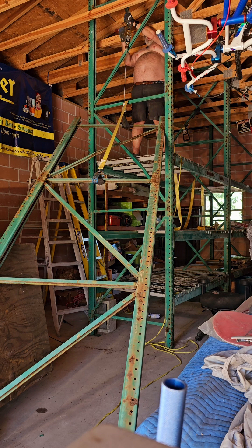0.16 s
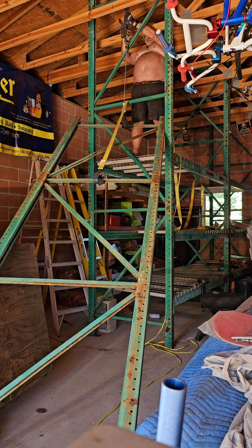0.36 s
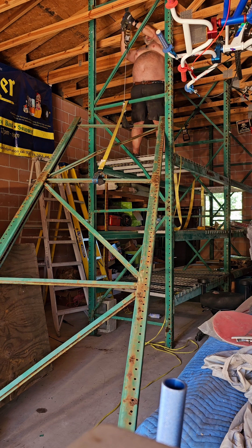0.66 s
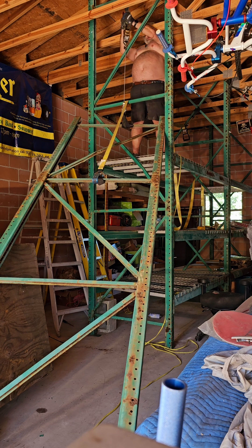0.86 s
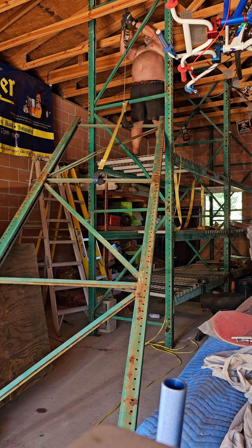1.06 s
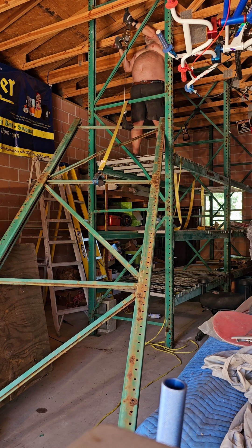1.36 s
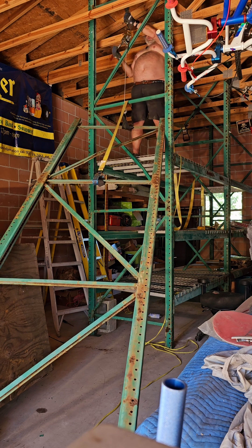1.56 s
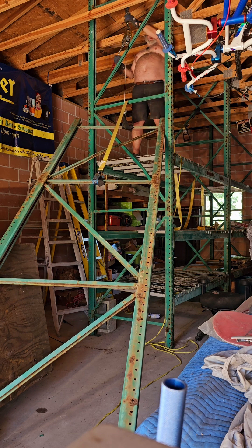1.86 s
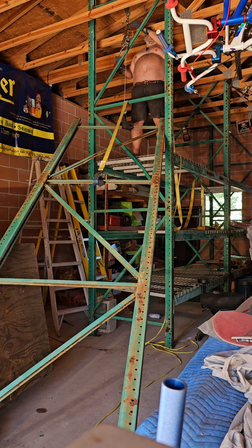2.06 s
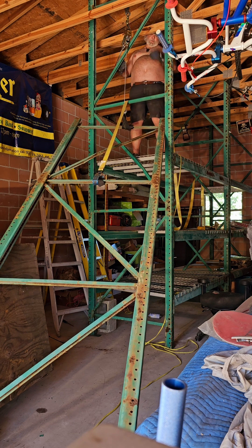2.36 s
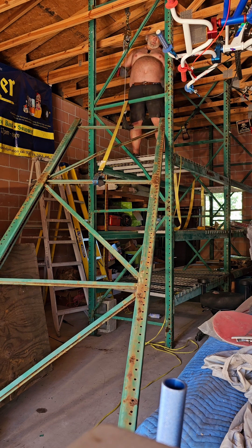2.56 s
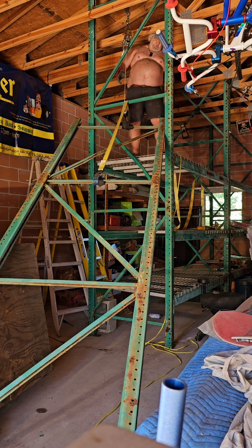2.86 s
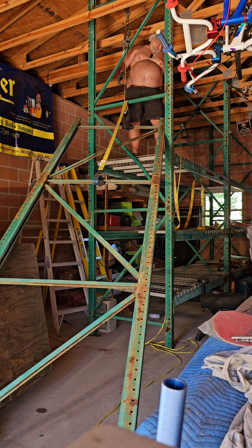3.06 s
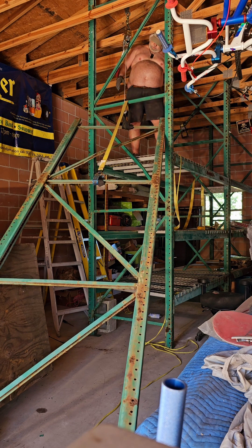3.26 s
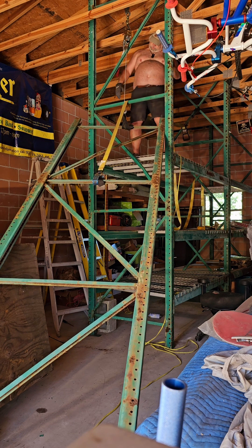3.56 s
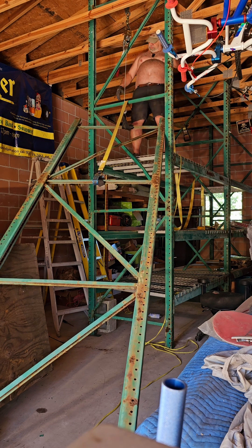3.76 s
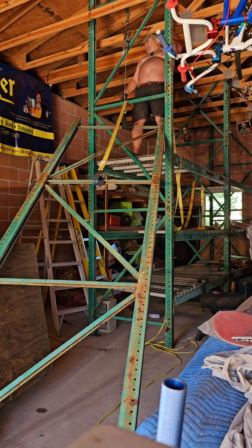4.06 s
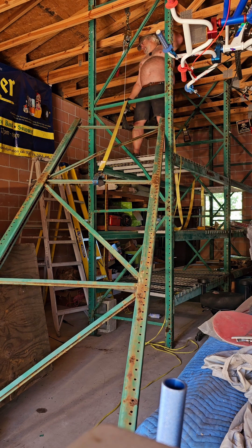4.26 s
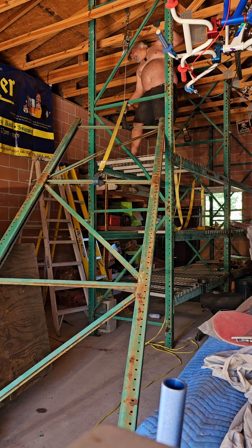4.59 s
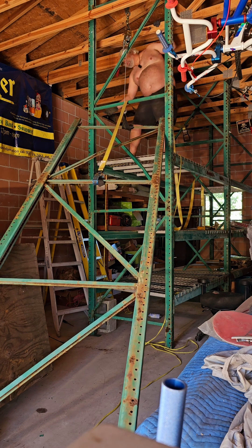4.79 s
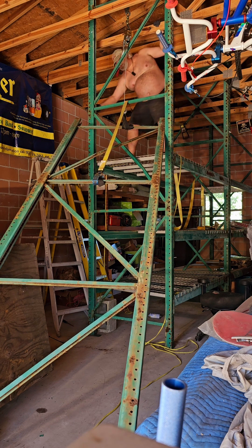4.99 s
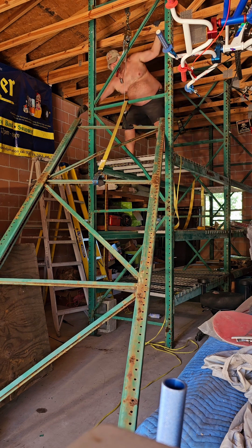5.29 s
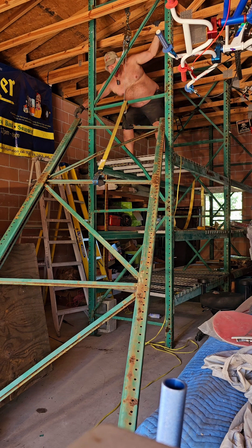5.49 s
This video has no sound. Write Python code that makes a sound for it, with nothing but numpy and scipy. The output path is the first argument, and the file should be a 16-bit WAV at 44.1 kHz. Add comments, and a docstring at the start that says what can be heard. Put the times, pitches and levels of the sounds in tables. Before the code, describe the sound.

Faint metal ticks open over quiet air and low rumble. One bright crack comes at about one second, then a cluster of chain snaps with a brief gritty scrape, then the biggest clank with a clangy decaying ring. A few softer clicks follow, and the last seconds are nearly empty: rumble, weak hum, slight frame singing. Wide stereo pickup in a hard garage.

```python
"""A chain hoist is worked on a steel storage rack in a garage: links and pawl snap as noise cracks with short rings.
Its hook knocks the frame: noise clangs and decaying modes, with a loud clank near 2.75 s.
The chain is drawn once over the steel: a dense train of tiny contacts.
Under it, shaped noise gives air, a low rumble that surges, a faint hum and soft singing of the frame;
a few dry ticks are short noise bursts."""
import sys
import numpy as np
from scipy import signal
from scipy.fft import rfft, irfft, next_fast_len
from scipy.io import wavfile

SR = 44100
rng = np.random.default_rng(int(sys.argv[2]) if len(sys.argv) > 2 else 0)


def master(y):
    """Save y as 16-bit WAV."""
    cut = np.clip(np.atleast_2d(y).T, -1, 1)
    pcm = np.round(cut * 32767)  # scale
    wavfile.write(sys.argv[1], SR, pcm.astype(np.int16))


N = 248283

# Snaps of links and pawl. Each row: start in seconds, level in dB, brightness in dB per octave, link pitch in Hz.
LINK_SNAPS = [(0.046, -43.5, 10.5, 3780), (0.324, -45.5, 1.5, 2150), (0.367, -42.5, -8, 4330),
              (0.706, -60, -5, 2130), (0.796, -42.5, -12, 3200), (0.973, -10.5, 2, 5213),
              (1.260, -36, -4.5, 3890), (1.416, -42, -16, 4240), (1.445, -18.5, 1, 4020),
              (1.558, -19.5, 5.5, 3440), (1.746, -20.5, 4.5, 4130), (2.0575, -21.5, 3.5, 4390),
              (2.718, -21.5, 3.5, 9100), (2.749, -14, -1.5, 4700), (2.876, -28.5, -5, 9020),
              (3.004, -34, -7, 4230), (3.119, -38, -14, 4020)]
# Knocks on the frame. Each row: start in seconds, level in dB, resonance of the struck part in Hz,
# its prominence in dB.
FRAME_KNOCKS = [(0.04, -48, 387, 17.5), (0.33, -51, 2200, -0.5), (0.797, -35.5, 2100, 10.5),
                (0.974, -30.5, 1650, 9), (1.365, -36, 465, 6), (1.447, -21.5, 3820, 10),
                (1.558, -30.5, 2400, 8), (1.748, -34, 2154, 5.5), (2.06, -41, 2220, -1),
                (2.56, -54, 2102, 11), (2.7494, -18, 1510, 16), (2.775, -24.5, 568, 14.5),
                (3.122, -33, 1250, 7.5)]
# Strongest modes of the frame. Each row: frequency in Hz, relative level in dB, T60 in seconds.
FRAME_MODES = [(363, -7.5, 2.1), (384.3, -4.5, 2), (430, -15.5, 0.606), (498.2, -1, 1.2), (532, 0.5, 0.76),
               (617.6, -3.5, 0.9), (820, -14.5, 2.4), (1106, -7.5, 1.9), (1135, -9, 1.7),
               (1324, -10.5, 1.508), (1430, -12.5, 1.1), (1400, -16.5, 0.51), (1629, -4, 0.74),
               (1700, -9, 0.214), (1737, -1.5, .6), (1808, -15, 0.51), (2039, -17, 0.44), (2300, -11, 1.4),
               (2900, -25.5, .9)]
# Modes of the steel hook. Each row: frequency in Hz, relative level in dB, T60 in seconds.
HOOK_MODES = [(2990, -16.5, 1), (3300, -9, 1), (4220, 0.5, 0.3334), (4157, -1.5, .3), (7500, -7, 0.9),
              (7310, -3, 0.47), (7490, 2.5, 0.48), (9050, -21, 0.78), (11285, -5.5, 0.27), (11930, -14, .3)]
# Spectrum of steel snaps. Each row: frequency in Hz, relative density in dB per Hz.
SNAP_SPECTRUM = [(100, -24), (500, -18.5), (1400, -6.5), (2000, -5.5), (3000, -6.5), (4300, -0.5),
                 (6000, -3), (9300, -5), (10300, -8), (11600, -7), (12700, -15), (15500, -20)]
# Spectrum of the knocked beams. Each row: frequency in Hz, relative density in dB per Hz.
BEAM_SPECTRUM = [(50, -27), (120, -12.5), (190, -13.5), (270, -9.5), (370, -1), (560, 1), (760, -7),
                 (1050, -5.5), (1650, -9.5), (2000, -0.5), (2500, -7.5), (3100, -4.5), (4200, -6),
                 (6500, -17.5), (14000, -41.5)]
# Spectrum of room air. Each row: frequency in Hz, relative density in dB per Hz.
AIR_SPECTRUM = [(30, -25), (70, -9), (170, -16), (350, -19), (530, -19), (700, -22), (1150, -23),
                (2000, -28), (3000, -34), (5000, -40), (9000, -50.5), (15000, -55)]
# Spectrum of the rumble. Each row: frequency in Hz, relative density in dB per Hz.
RUMBLE_SPECTRUM = [(15, -34.5), (30, -27), (42, 1.5), (55, -4.5), (80, -7), (160, -26.5), (400, -69.5),
                   (2000, -110)]
# Decay of the garage. Each row: frequency in Hz, T60 in seconds.
GARAGE_DECAY = [(200, .8), (1000, .7), (2600, .52), (4500, .38), (7000, .29), (11000, .23), (16000, .18)]
# Decay of the beams. Each row: frequency in Hz, T60 in seconds.
BEAM_DECAY = [(150, 5), (400, 1.3), (1000, 1.885), (1800, 1.105), (2800, 1.113), (5000, 0.71), (12000, 1.3)]
# Hum components. Each row: frequency in Hz, relative level in dB.
HUM_TONES = [(120, -3.5), (205, -1.5), (242, -8)]
# Tones of the singing frame. Each row: frequency in Hz, relative level in dB.
SINGING_TONES = [(365, -6), (480, -7), (525, -3), (605, -6.5), (830, -12), (985, -8.5), (1090, -5.5),
                 (1140, -2.5), (1308, -5)]
# Colour of the two microphone ports. Each row: frequency in Hz, left minus right in dB.
PORT_BALANCE = [(380, 0), (700, 2.5), (1290, 0), (2380, 0), (4400, -5.5), (8100, 5), (15000, 5.5)]
# Rumble surges. Each row: start in seconds, decay time constant in seconds, level before build-up and decay in dB.
RUMBLE_SURGES = [(0, 0.098, -44.5), (1.0, .9, -52.5), (3.498, 0.73, -50), (5.4, 0.41, -53)]
# Faint dry ticks. Each row: start in seconds, level before decay in dB.
DRY_TICKS = [(4.404, -57), (5.554, -65), (5.609, -61)]

AIR_DB, RUMBLE_DB, HUM_DB = -59, -60.5, -63
SURGE_RISE_S = 0.066
# The frame sings all the time and swells once as weight shifts on it.
SING_DB, LEAN_S, LEAN_SETTLE_S, LEAN_DB = -64, 4.88, 1.1, -56
TICK_HZ, TICK_WIDTH_HZ, TICK_DECAY_S = 7000, 2500, .003
# The drag rises in level, holds, then stops.
DRAG_START_S, DRAG_RISE_S, DRAG_END_S, DRAG_DB, DRAG_GROWTH_DB = 1.285, 0.059, 1.47, -48, 28
# Softer knocks than the reference are slightly duller and barely stir the hook.
REF_BLOW_DB, REF_TILT_DB_PER_OCT, REF_HOOK_DB = -17, -0.23, -30
TILT_DB_PER_OCT_PER_DB, HOOK_DB_PER_DB = 0.01, 2
# A slack link, lightly touched, rings freely; a taut one, snapped hard, is damped.
LIGHT_SNAP_DB, LINK_RING_DB, LINK_DAMPING_DB_PER_DB = -44.5, -7, 0.41
MIC_GAP_M, LEFT_LEAD_S = .15, .00026
EDGE_HZ = 15550


def amp(db):
    """Decibels to gain."""
    return 10 ** (np.asarray(db) / 20)


def unit(x):
    """Scales to rms 1."""
    return x / np.sqrt(np.mean(x ** 2) + 1e-20)


def read(points, hz):
    """Reads a table along a log-frequency axis."""
    f, value = np.transpose(points)
    return np.interp(np.log(hz + 1), np.log(f + 1), value)


def add(mix, start_s, sound):
    """Mixes in a stereo sound at start_s."""
    part = mix[:, max(round(start_s * SR), 0):][:, :sound.shape[1]]
    part += sound[:, :part.shape[1]]


def peak(hz, centre_hz, width_hz):
    """Bell of one resonance: 1 at its centre, 1/2 at width_hz to either side."""
    return 1 / (1 + ((hz - centre_hz) / width_hz) ** 2)


def ripple(hz, width_hz):
    """Random peaks and dips along frequency: many overlapping resonances."""
    heights = rng.standard_normal(4096)
    return np.interp(hz / width_hz, np.arange(len(heights)), heights)


def likeness(hz):
    """Correlation of two spaced microphones in sound that comes from all sides."""
    return .99 * np.sinc(2 * hz * MIC_GAP_M / 343)


def diffuse(colour_db):
    """Stereo noise from all sides with the given spectrum, rms 1."""
    same = likeness(np.linspace(0, SR / 2, len(colour_db)))
    a, b = np.exp(2j * np.pi * rng.random((2, len(same))))
    mid = a * np.sqrt(1 + same)
    side = b * np.sqrt(1 - same)
    return unit(irfft(np.array([mid + side, mid - side]) * amp(colour_db)))


def swell(t, hz, spread_s):
    """Build-up of a vibration: spread_s is its time constant at 1 kHz, and bass comes later."""
    rise_s = spread_s * (1000 / np.maximum(hz, 450)) ** 1.5
    return 1 - np.exp(-(t + 1 / SR) / rise_s)


def fade(x, t60, spread_s):
    """Each band swells and dies at its own speed."""
    hz, t, z = signal.stft(x, SR, nperseg=256)
    decay = amp(-60 * t / read(t60, hz)[:, None])
    z = z * decay * swell(t, hz[:, None], spread_s)
    return signal.istft(z, SR, nperseg=256)[1][:, :x.shape[1]]


def ring(modes, t, spread_s, twin_hz):
    """Dying modes, each with a weaker beating twin; low modes take longer to build up."""
    out = np.zeros((2, len(t)))
    for hz, db, t60_s in modes:
        phase, twin_phase = 2 * np.pi * rng.random(2)
        twin = hz + twin_hz * rng.standard_normal()
        # opposite phase shifts give the channels the diffuse correlation
        apart = np.arccos(likeness(hz)) * rng.choice([-.5, .5]) * np.array([[1], [-1]])
        turn = np.exp(1j * (2 * np.pi * hz * t + phase))
        turn = turn + .5 * np.exp(1j * (2 * np.pi * twin * t + twin_phase))
        envelope = amp(db - 60 * t / t60_s) * swell(t, hz, spread_s)
        out += envelope * (turn * np.exp(1j * apart)).real
    return out


def direct(x):
    """Sound straight from the hoist reaches the left microphone first."""
    hz = np.fft.rfftfreq(len(x), 1 / SR)
    right = irfft(rfft(x) * np.exp(-2j * np.pi * hz * LEFT_LEAD_S), len(x))
    return np.array([x, right])


def surge(start_s, settle_s, db):
    """Gain that rises quickly and dies away more slowly."""
    t = np.maximum(np.arange(N) / SR - start_s, 0)
    return amp(db) * (1 - np.exp(-t / SURGE_RISE_S)) * np.exp(-t / settle_s)


def tone_colour(hz, tones, width_hz):
    """Spectrum in dB of narrow resonances, which turn noise into wavering tones."""
    return 20 * np.log10(sum(amp(db) * peak(hz, f, width_hz) ** 2 for f, db in tones))


def background(hum_width_hz=5, singing_width_hz=20):
    """Diffuse noise: room air, a surging rumble, a wavering hum, and the faint singing of the loaded frame."""
    hz = np.fft.rfftfreq(2 * next_fast_len(N // 2 + 1), 1 / SR)
    air = diffuse(read(AIR_SPECTRUM, hz))[:, :N]
    rumble = diffuse(read(RUMBLE_SPECTRUM, hz))[:, :N]
    hum = diffuse(tone_colour(hz, HUM_TONES, hum_width_hz))[:, :N]
    singing = diffuse(tone_colour(hz, SINGING_TONES, singing_width_hz))[:, :N]
    rumble_gain = np.hypot(amp(RUMBLE_DB), sum(surge(*row) for row in RUMBLE_SURGES))
    singing_gain = np.hypot(amp(SING_DB), surge(LEAN_S, LEAN_SETTLE_S, LEAN_DB))
    return amp(AIR_DB) * air + rumble_gain * rumble + amp(HUM_DB) * hum + singing_gain * singing


def ticks():
    """Tiny clicks: band-shaped noise dying in milliseconds, with no ring and no room."""
    out, t, hz = np.zeros((2, N)), np.arange(2048) / SR, np.fft.rfftfreq(2048, 1 / SR)
    colour = 20 * np.log10(peak(hz, TICK_HZ, TICK_WIDTH_HZ))
    for start_s, db in DRY_TICKS:
        add(out, start_s, amp(db) * diffuse(colour) * np.exp(-t / TICK_DECAY_S))
    return out


def drag(contacts_per_s=300, tail_s=0.019):
    """The chain drawn over steel: many tiny link contacts, blurred by the room."""
    t, hz = np.arange(8192) / SR, np.fft.rfftfreq(8192, 1 / SR)
    contacts = rng.standard_normal(N) * (rng.random(N) < contacts_per_s / SR)
    contact_sound = diffuse(read(SNAP_SPECTRUM, hz)) * np.exp(-t / tail_s)
    now = np.arange(N) / SR
    growth = np.clip((now - DRAG_START_S) / DRAG_RISE_S, 0, 1)
    active = (now > DRAG_START_S) * (now < DRAG_END_S)
    stroke = amp(DRAG_DB - DRAG_GROWTH_DB * (1 - growth)) * active
    return unit(signal.oaconvolve(contacts[None], contact_sound, axes=1)[:, :N]) * stroke


def knocks(modes_db=-9.5, beams_db=-2, part_width_hz=230):
    """Bending waves spread through bolted beams: a dense clang, clear frame modes, and the hook's own ring."""
    out, t, hz = np.zeros((2, N)), np.arange(2 * SR) / SR, np.fft.rfftfreq(2 * SR, 1 / SR)
    fine = 4 * ripple(hz, width_hz=9)
    broad = 4.5 * ripple(hz, width_hz=45) * np.minimum(hz / 3000, 1)
    beams = read(BEAM_SPECTRUM, hz) + (fine + broad)
    for start_s, db, part_hz, part_db in FRAME_KNOCKS:
        harder_db = db - REF_BLOW_DB
        tilt = REF_TILT_DB_PER_OCT + TILT_DB_PER_OCT_PER_DB * harder_db
        hook_db = REF_HOOK_DB + HOOK_DB_PER_DB * harder_db
        # a harder blow is brighter; the struck part stresses its own band
        blow = tilt * np.log2(np.clip(hz, 350, 5000) / 1200)
        blow = blow + part_db * peak(hz, part_hz, part_width_hz)
        # colour the blow without changing the beams' power
        blow = blow - 10 * np.log10(np.average(amp(blow) ** 2, weights=amp(beams) ** 2))
        clang = fade(diffuse(beams + blow), BEAM_DECAY, spread_s=0.011)
        # the same blow weights the modes
        modes = [(f, mode_db + np.interp(f, hz, blow), t60_s) for f, mode_db, t60_s in FRAME_MODES]
        tones = ring(modes, t, spread_s=0.027, twin_hz=7)
        add(out, start_s, amp(db) * (amp(beams_db) * clang + amp(modes_db) * tones))
        add(out, start_s, amp(hook_db) * ring(HOOK_MODES, t, spread_s=0.0044, twin_hz=34.4))
    return out


def snaps(crack_gain=2 * amp(-1), crack_s=0.0035, early_db=-6, room_db=-6.0, room_tilt_db_per_oct=-2.5,
          link_width_hz=100, link_cycles=1600):
    """Steel on steel: a crack, echoes off the rafters, the duller tail of the garage, and the link's ring."""
    out, t, hz = np.zeros((2, N)), np.arange(32768) / SR, np.fft.rfftfreq(32768, 1 / SR)
    octaves = np.log2(np.maximum(hz, 500) / 5000)
    contact = 1 - np.exp(-t / .0018)
    # T60 lasts the same number of cycles at every frequency
    link_t60 = [(f, link_cycles / f) for f in np.geomspace(2000, 16000, 4)]
    for start_s, db, tilt, link_hz in LINK_SNAPS:
        link_db = LINK_RING_DB - LINK_DAMPING_DB_PER_DB * (db - LIGHT_SNAP_DB)
        resonances = 2.5 * ripple(hz, width_hz=260) + 3.8 * ripple(hz, width_hz=50)
        colour = read(SNAP_SPECTRUM, hz) + tilt * octaves + resonances
        crack = direct(diffuse(colour)[0] * contact * np.exp(-t / crack_s))
        early = diffuse(colour) * contact * np.exp(-t / .024)
        tail = fade(diffuse(colour + room_tilt_db_per_oct * octaves), GARAGE_DECAY, spread_s=0.023)
        # short bar: a split first mode and a weaker, shorter one at 2.76 times its pitch
        bar_modes = [(1, 1), (1.05, .45), (2.76, .3)]
        bells = sum(peak(hz, ratio * link_hz, link_width_hz) * height for ratio, height in bar_modes)
        link = contact * fade(diffuse(20 * np.log10(bells)), link_t60, spread_s=0.0055)
        room = amp(early_db) * early + amp(room_db) * tail
        add(out, start_s, amp(db) * (crack_gain * crack + room + amp(link_db) * link))
    return out


def scene():
    """Garage, rack and hoist together."""
    return background() + ticks() + drag() + knocks() + snaps()


def record(dry):
    """Each microphone port adds its own colour; then a low-pass limits the band."""
    size = 2 * next_fast_len(N)
    balance_db = read(PORT_BALANCE, np.fft.rfftfreq(size, 1 / SR))
    ports = irfft(rfft(dry, size) * amp([balance_db / 2, -balance_db / 2]))[:, :N]
    low_pass = signal.firwin(255, EDGE_HZ, window=("kaiser", 9), fs=SR)
    return signal.oaconvolve(ports, low_pass[None], "same", axes=1)


dry = scene()
out = record(dry)
master(out)
```